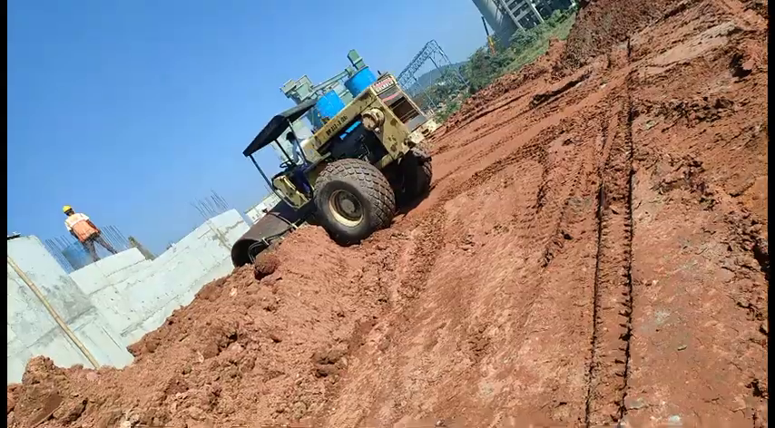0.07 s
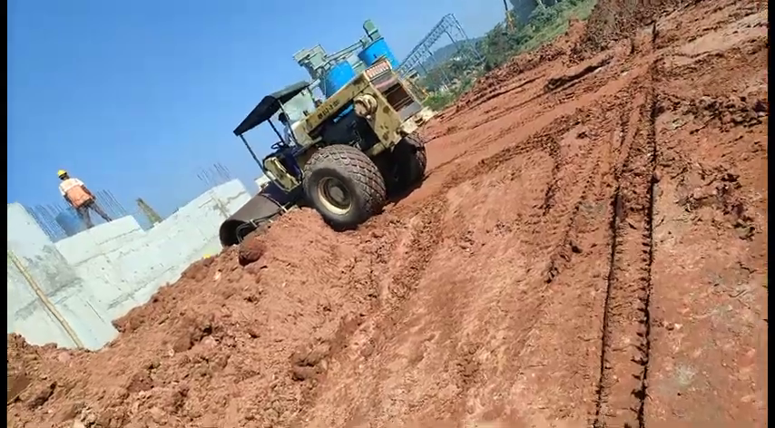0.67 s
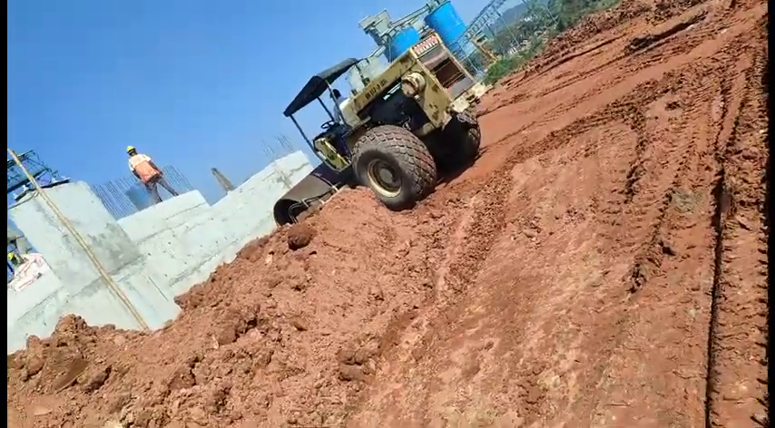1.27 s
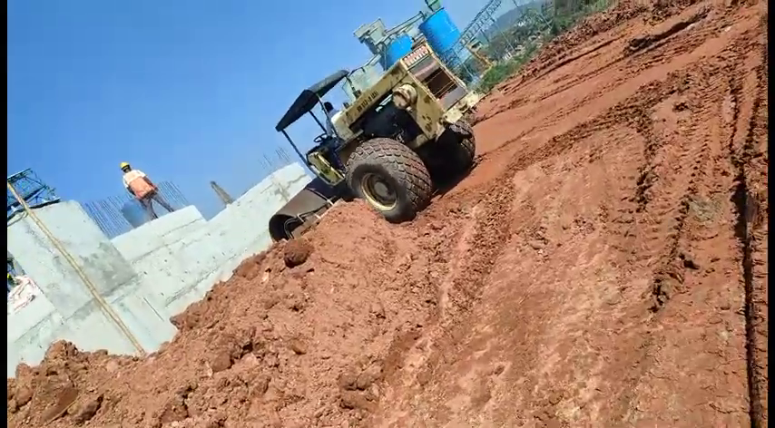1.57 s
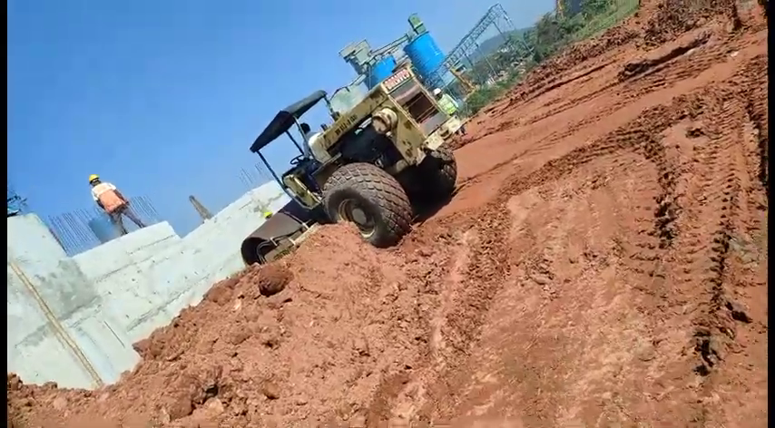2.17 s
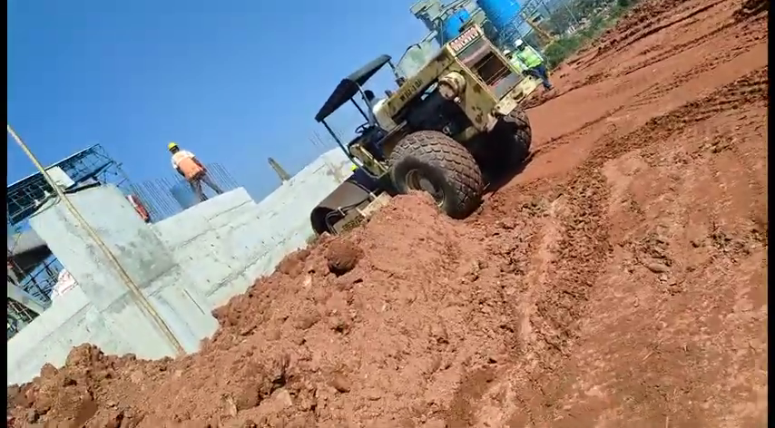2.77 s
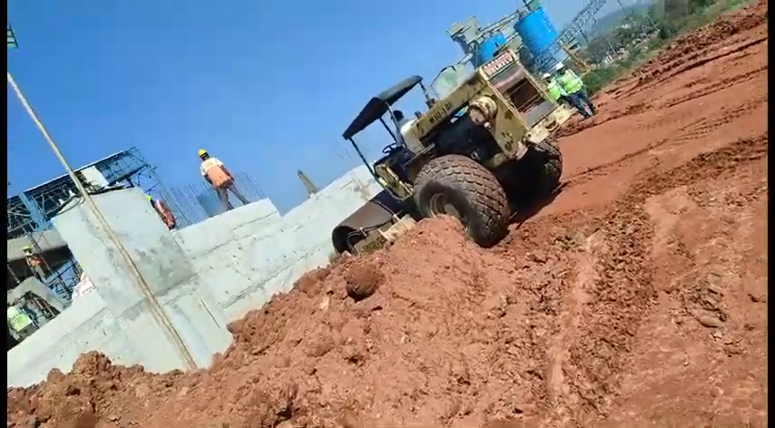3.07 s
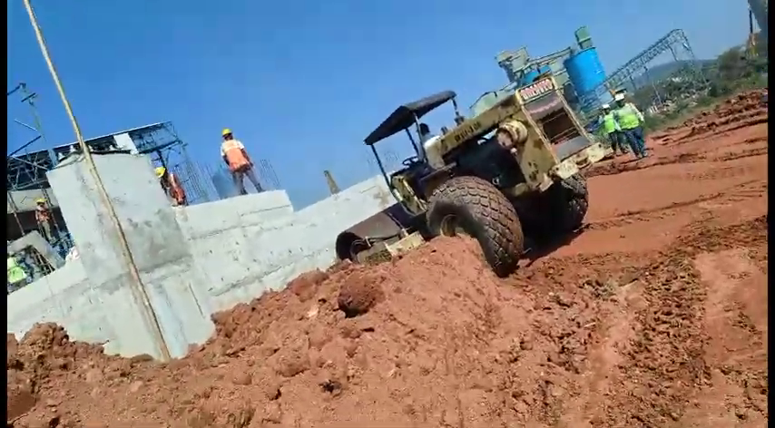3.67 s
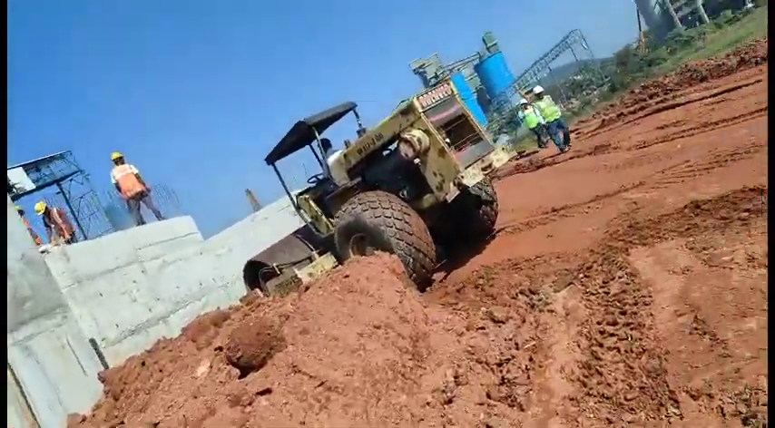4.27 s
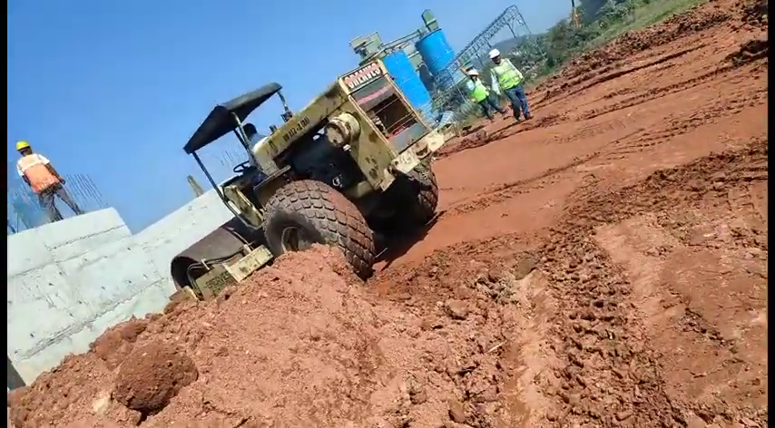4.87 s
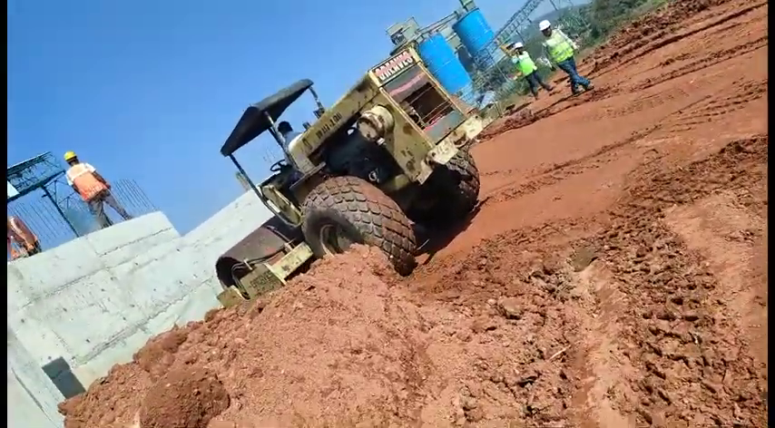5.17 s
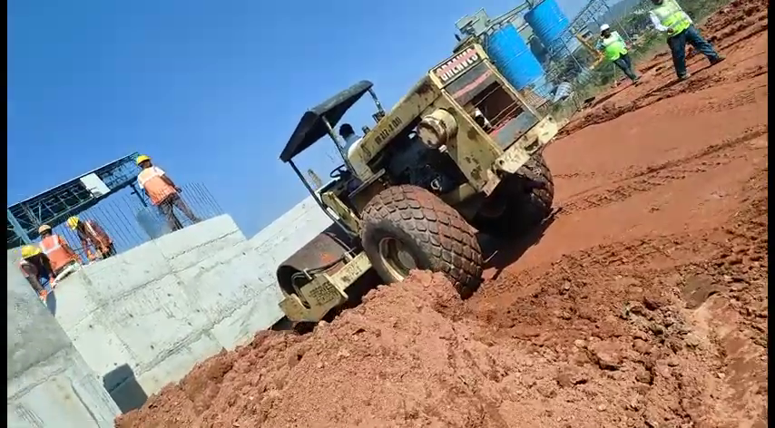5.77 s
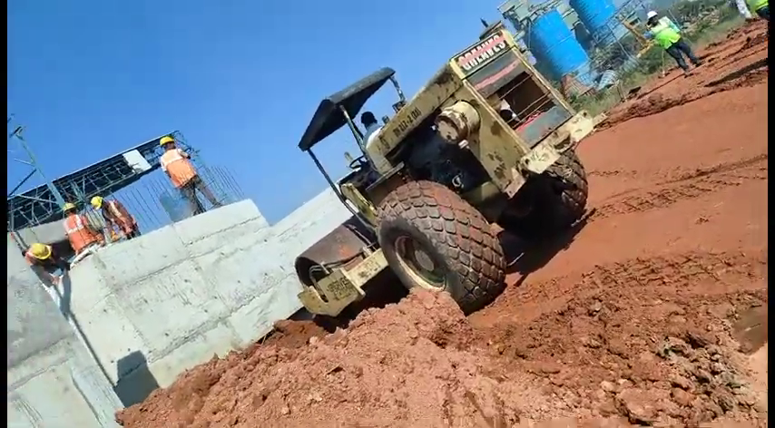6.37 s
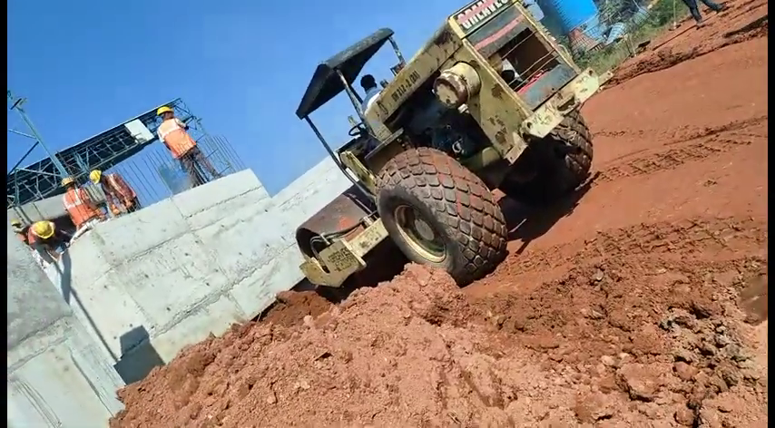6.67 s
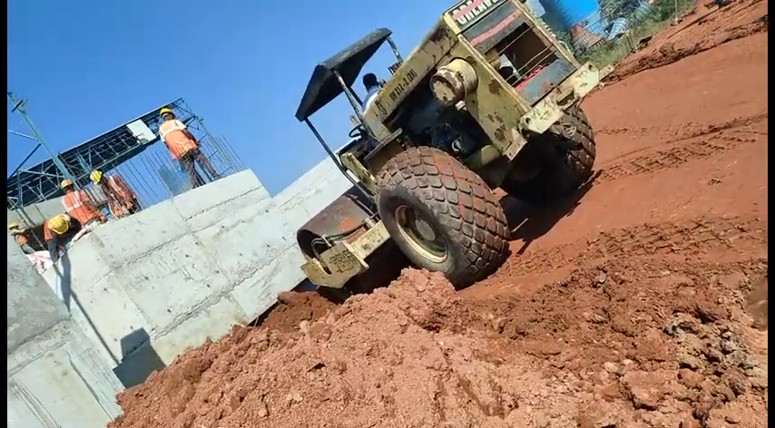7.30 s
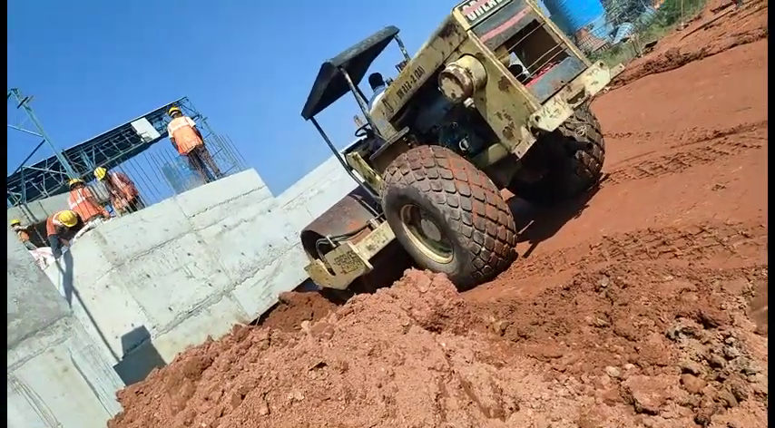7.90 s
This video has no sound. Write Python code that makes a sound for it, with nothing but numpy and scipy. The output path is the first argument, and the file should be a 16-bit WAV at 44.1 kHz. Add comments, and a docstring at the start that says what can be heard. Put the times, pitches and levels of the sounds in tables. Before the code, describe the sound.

A soil roller's diesel engine fades in within the first half second, outdoors on a construction site, and runs on as a low, steady drone with little change in level. The exhaust booms and lopes, the engine knocks and clatters in a fast, even rhythm, and a hydraulic pump whines over the rush of a cooling fan, its tones swelling and receding. From about 1 second, tinny bands of clatter drift slightly in pitch. A loose panel buzzes with a hollow rattle from around 2 seconds and settles by 4.5. Between 4.5 and 6 seconds the roller draws near, its clatter turning brighter and its low throb fuller. From 6 seconds it is close, and rapid, heavy blows ring the metal engine cover. After 7 seconds the engine speed wavers slightly and the whine sinks, while the drone and knocking continue to the end at 8 seconds.

```python
"""A soil roller fades in, backing slowly over loose earth on a low, steady six-cylinder diesel. The
exhaust booms and lopes, the block knocks and clatters in step with the crankshaft, and a nine-piston
hydraulic pump whines over the rush of the fan. As the engine bay swings into view, tinny bands of
clatter drift in pitch and a loose panel buzzes, then settles. From about 6 s the roller is close and
heavy blows ring the engine cover; in the last second the whine sinks with the oil pressure."""
import sys
import numpy as np
from scipy.fft import rfft, irfft, next_fast_len
from scipy.io import wavfile
from scipy.ndimage import map_coordinates

SR = 44100
rng = np.random.default_rng(int(sys.argv[2]) if len(sys.argv) > 2 else 0)


def bounce(signal):
    """Save signal as a 16-bit WAV file at the path given by the first command-line argument."""
    frames = np.transpose(np.atleast_2d(signal))
    limited = np.clip(frames, -1, 1)
    pcm = np.round(limited * 32767).astype(np.int16)
    wavfile.write(sys.argv[1], SR, pcm)


N = 354563

# engine speed: t/s, firing rate/Hz
FIRING_RATE = [(0, 56.6), (0.7, 56.01), (1, 56.52), (2.7, 56.42), (3.15, 55.83), (3.5, 56.19), (3.9, 55.68),
               (4.65, 55.19), (4.95, 56.03), (5.4, 56.04), (5.8, 57.1), (6.5, 57.6), (6.93, 56.97),
               (7.05, 58.9), (7.16, 59.3), (7.28, 58.3), (7.4, 56.96), (7.58, 57.22), (7.8, 59.24),
               (8.04, 58.01)]
# the roller's approach: t/s, nearness/0-1
NEARNESS = [(0, 0.04), (4.4, 0.08), (5.5, 0.32), (6.3, 0.79), (8, 0.94)]
# the open engine bay swings into view and away: t/s, view/0-1
BAY_VIEW = [(0.4, 0.13), (2.5, 0.7), (3.8, 0.94), (5.2, 1), (6.9, 0.73), (8, 0.2)]
# cylinders in firing order: excess puff strength/relative, clatter level/dB
CYLINDERS = [(-0.78, 4.5), (0.12, 6), (1, 5.5), (0.21, 5.5), (0.11, 5), (0.31, 4)]
# exhaust boom: harmonic of the firing rate, far level/dB, near level/dB
EXHAUST_BOOM = [(1, -15.4, -15.3), (2, -21.9, -21.4), (3, -22.7, -35.5)]
# its weak overtones: harmonic of the firing rate, far level/dB, near level/dB
EXHAUST_OVERTONES = [(4, -39.5, -34.5), (5, -47, -38)]
# tone colour of the exhaust pipe: f/Hz, level/dB
PIPE_COLOUR = [(15, 3), (35, 6), (47, 8.5), (66, 13), (76, 5.5), (85, 25.5), (95, -23.5), (104, 5),
               (125, -0.5), (160, -3.5), (210, -0.5), (255, 4.5), (310, -23), (420, -42), (900, -31.5),
               (2500, -120)]
# knocks in one engine cycle: position/firings, f/Hz, level/dB, facing the listener at t/s, half-span/s
KNOCKS = [(0.3, 2510, -29.5, 5.9, 1.4), (0.65, 1143, -25.5, 7, 2.5), (0.9, 583, -34.5, 0.76, 1.5),
          (1.05, 1054, -26.5, 3.5, 3.4), (1.1, 2485, -34, 5.5, 3.26), (1.57, 1090, -24.5, 6.8, 1.7),
          (0.1, 1000, -31, 4.9, 1.3), (5.45, 1000, -33, 4.7, 1.2), (1.6, 2500, -40, 3.3, 4.6),
          (1.8, 528, -35.5, 1.8, 3), (1.92, 1059, -24, 4.1, 2.0), (2.25, 2500, -26.5, 4.6, 1.4),
          (2.5, 582, -35, 1.48, 1.2), (2.98, 1054, -30, 5.2, 2.4), (3.4, 1010, -26, 5.1, 2),
          (3.97, 1010, -24, 4.3, 3.3), (4.52, 2510, -28, 4.9, 2.9), (4.63, 1090, -29, 6.1, 2.6),
          (4.72, 594, -28, 7.7, 0.98), (5.0, 1020, -31, 4.26, 0.61), (5.6, 2499, -27, 2.8, 1.8),
          (5.8, 1245, -33, 1.6, 2.7)]
# heavy blows as the engine labours close by: t/s, level/dB
HEAVY_BLOWS = [(6.061, -27), (6.162, -28), (6.217, -21), (6.426, -26), (6.476, -26), (6.531, -26),
               (6.636, -26), (6.741, -22), (6.791, -25), (6.844, -22.5), (6.896, -27), (6.951, -22.5),
               (6.999, -26), (7.056, -27), (7.154, -27), (7.256, -25), (7.359, -22), (7.416, -28),
               (7.463, -23), (7.52, -28), (7.57, -22.5), (7.624, -28), (7.672, -23), (7.775, -20.5),
               (7.878, -23), (7.98, -22.5)]
# ring of the engine cover: f/Hz, level/dB, t60/s
COVER_MODES = [(600, -11, 0.042), (1074, -7.5, 0.04), (1227, -3, 0.045), (1462, -10, 0.074),
               (1740, -11, 0.025), (2060, -15, 0.025), (2630, -12, 0.02)]
# dull crack of a blow: f/Hz, level/dB
CRACK_COLOUR = [(600, -12), (1300, 0), (2200, -5), (3400, -14), (6000, -36), (11000, -80)]
# ring of the engine block: f/Hz, bandwidth/Hz, level/dB
BLOCK_MODES = [(536, 30, -7), (650, 54, -3), (1012, 95, 2), (1215, 180, -5), (2517, 105, -9.5),
               (2790, 170, -21)]
# colour of the clatter, far and near: f/Hz, level/dB
CLATTER_FAR = [(710, -47), (1200, -6), (1450, -2), (1700, -6.5), (2120, -8), (2440, -1), (2760, -4.5),
               (3150, -12.5), (3560, -11), (4500, -21), (5000, -14), (6500, -39)]
CLATTER_NEAR = [(710, -15), (1200, -9), (1400, -6.5), (1670, -9), (1950, -7.5), (2430, -7.5), (2690, -6),
                (2960, -9), (3310, -7), (3900, -13), (5000, -13.5), (6500, -36.5)]
# top-end hiss of gears and fan: f/Hz, level/dB
HISS_COLOUR = [(2060, -29), (3500, -0.5), (4690, -4.5), (6360, 1.5), (6730, -2.5), (7570, -15),
               (9420, -17.5), (10400, -16.5), (12000, -27.5), (14800, -41), (15500, -30)]
# strong pump tones: harmonic, far level/dB, near level/dB, gain with the bay in view/dB
PUMP_TONES = [(2, -51, -41.5, 3.2), (3, -45.5, -44.5, -5), (4, -46.5, -45, 2.5), (6, -47.5, -43.5, 6),
              (10, -47, -47, -4.5), (12, -56, -54, 0)]
# faint pump tone: harmonic, level/dB
PUMP_FAINT = [(16, -51.5)]
# the whine rides the oil pressure: t/s, gain/dB
PUMP_LOAD = [(0.2, -2.5), (0.8, -1), (3.4, 0), (4.1, -2), (5.1, 1.5), (7.1, 1.5), (7.55, -6.5), (8, -9)]
# single pump tones sing out or sink away: start/s, end/s, harmonic, gain/dB
PUMP_SWELLS = [(-0.2, 1.0, 10, 5.5), (0.5, 1.6, 3, 7.5), (1.55, 2.15, 3, 12), (1.3, 4.0, 10, 4.5),
               (2.0, 3.7, 2, 3), (3.1, 3.6, 3, 12.5), (1.8, 3.5, 10, 1.5), (3.25, 3.75, 10, 3.5),
               (3.55, 5.05, 2, -6), (4.4, 6.0, 4, 2), (4.85, 5.9, 2, 3.5), (4.85, 5.7, 12, 10),
               (5.7, 6.75, 6, 3), (6.0, 7.05, 10, 3), (6.72, 7.02, 4, 4), (6.94, 7.12, 6, 9.5),
               (7.07, 7.4, 6, 5), (7.6, 8.3, 3, 11)]
# buzz of the loose panel: t/s, level/dB
PANEL_BUZZ = [(1.75, -52), (2.0, -33), (2.35, -33.5), (2.6, -30.5), (3.25, -30), (3.45, -37), (3.9, -33),
              (4.5, -52)]
# its hollow rattle: f/Hz, level/dB
PANEL_COLOUR = [(200, -38.5), (275, 3), (380, -17), (520, -30), (900, -78)]
# tinny, gliding bands of engine clatter: start/s, end/s, first f/Hz, last f/Hz, level/dB
TINNY_BANDS = [(0.6, 1.55, 1660, 1460, -46), (1.3, 3.4, 1410, 1330, -41), (1.3, 3.7, 1830, 1870, -47.5),
               (3.3, 4.0, 1300, 1200, -39.5), (3.35, 4.4, 1120, 1070, -37.5), (3.8, 4.6, 1380, 1380, -46),
               (4.3, 5.8, 1160, 1150, -43), (4.45, 5.7, 1560, 1460, -43), (5.7, 8.3, 1190, 1240, -43.5)]
# colour of the fan's rush, far and near: f/Hz, level/dB
FAN_FAR = [(20, -12), (38, -17), (60, -25), (150, 7), (240, -0.5), (320, -8), (410, -7), (520, -2),
           (660, -7.5), (790, -12), (1000, -8), (1300, -11), (2200, -62)]
FAN_NEAR = [(20, -12), (38, 8.5), (60, -15), (150, 3), (240, 0), (320, -10.5), (410, -14.5), (520, -1.5),
            (660, -6), (790, -8.5), (1000, -12), (1300, -15), (2200, -57)]
# stereo width by band: f/Hz, left-right correlation
STEREO_LIKENESS = [(150, 1), (230, 0.96), (320, 0.7), (480, 0.68), (650, 1), (820, 0), (1020, 0.8),
                   (1400, 0.12), (2400, 0.44), (3200, 0.187), (5000, -0.25), (7000, 0), (14000, 0)]
# stereo balance by band: f/Hz, left minus right/dB
STEREO_LEAN = [(60, -0.86), (170, -0.8), (280, 1.5), (700, -1.5), (1200, 2.1), (2000, -5.5), (3300, 0),
               (5500, 0), (9000, 6), (15000, -1)]

CYCLE = len(CYLINDERS)  # firings per engine cycle, two revolutions
HIT_SCATTER_DB, HIT_DETUNE = 1.6, 0.008  # hit-to-hit spread of level and relative pitch


def exhaust(crank, near):
    """The even part of the firing train: a boom smeared by the silencer, under clean overtones."""
    boom_lag, overtone_lag, smear_rad = 0.115, 0.043, 1.28  # lags in firings
    boom = np.zeros(N)
    for k, *levels_db in EXHAUST_BOOM:
        phase = 2 * np.pi * k * (crank - boom_lag) + smear_rad * (k - 2) ** 2 + 1
        boom += amp(between(levels_db, near) + 0.11 * wobble(18)) * np.cos(phase)
    for k, *levels_db in EXHAUST_OVERTONES:
        phase = 2 * np.pi * k * (crank - overtone_lag)
        boom += amp(between(levels_db, near) + wobble(2.71)) * np.cos(phase)
    return np.sqrt(2) * boom


def lope(crank, low_cut_hz=32):
    """Unequal cylinders send stronger and weaker puffs down the pipe, whose mouth sheds the sub-bass."""
    firings = np.arange(int(crank[-1]))
    excess = np.resize(np.transpose(CYLINDERS)[0], len(firings))
    excess += 0.14 * rng.standard_normal(len(firings))
    puffs = pulses(crank, firings + 0.076, -excess)
    mouth = lambda hz: hz ** 8 / (hz ** 8 + low_cut_hz ** 8)
    return amp(-29.5) * unit(filtered(puffs, lambda hz: causal(amp(along(PIPE_COLOUR, hz))) * mouth(hz)))


def knocks(crank):
    """Pistons and valves strike at set crank angles; each part rings loudest as it faces the listener."""
    ring_cycles, rise_cycles, click_db, click_s = 5, 0.8, -8, 0.0013
    turned_db, jitter_firings = -6, 0.015  # loss a half-span from facing; timing spread
    t = np.arange(round(0.05 * SR)) / SR
    cycles = np.arange(0, crank[-1] - CYCLE / 2, CYCLE)
    rings, click_envelope = np.zeros((2, N + len(t))), np.zeros(N + len(t))
    for row, (place, hz, db, facing_s, span_s) in enumerate(KNOCKS):
        late, loud, sharp = rng.standard_normal((3, len(cycles), 1))
        at = np.searchsorted(crank, cycles[:, None] + place + jitter_firings * late)
        wander_db = map_coordinates(rng.standard_normal(64), [at * 3 / SR], mode="wrap")
        facing_db = turned_db * ((at / SR - facing_s) / span_s) ** 2
        size = amp(db + facing_db + HIT_SCATTER_DB * loud + wander_db)
        envelope = np.exp(-t * hz / ring_cycles) * (1 - np.exp(-t * hz / rise_cycles))
        ring = np.sqrt(2) * size * envelope * np.exp(2j * np.pi * hz * (1 + HIT_DETUNE * sharp) * t)
        placed = lambda hits: np.bincount((at + np.arange(len(t))).ravel(), hits.ravel(), N + len(t))
        rings += [placed(ring.imag), (-1) ** row * placed(ring.real)]
        click_envelope += placed(size * np.exp(-t / click_s))
    clicks = amp(click_db) * click_envelope[:N] * noise(CLATTER_NEAR)
    pair = rings[:, :N] + clicks
    return np.std(pair) * spread(pair)


def cover_blows(crack_db=-9, crack_s=0.006, rise_s=0.0011):
    """Each heavy blow cracks and rings the engine cover, a little differently every time."""
    t = np.arange(round(0.08 * SR)) / SR
    hz, mode_db, t60 = np.transpose(COVER_MODES)[:, :, None]
    attack = 1 - np.exp(-t / rise_s)
    rings, crack_envelope = np.zeros((2, N + len(t))), np.zeros(N + len(t))
    for start_s, db in HEAVY_BLOWS:
        loud, sharp, turn = rng.standard_normal((3, len(COVER_MODES), 1))
        envelopes = attack * amp(db + mode_db + HIT_SCATTER_DB * loud - 60 * t / t60)
        phase = 2 * np.pi * hz * (1 + HIT_DETUNE * sharp) * t
        span = slice(round(start_s * SR), round(start_s * SR) + len(t))
        rings[:, span] += np.sqrt(2) * np.sum(envelopes * np.sin([phase, phase + np.pi * turn]), 1)
        crack_envelope[span] += amp(db + crack_db) * np.exp(-t / crack_s)
    pair = rings[:, :N] + crack_envelope[:N] * noise(CRACK_COLOUR)
    return np.std(pair) * spread(pair)


def clatter(crank, colour, tick_db, repeat, grain_db):
    """Injectors and gears chatter, harder on some cylinders; each firing nudges the level by tick_db."""
    cylinder_db = np.interp(crank, np.arange(CYCLE), np.transpose(CYLINDERS)[1], period=CYCLE)
    tick = np.exp(-((crank + 0.45) % 1) / 0.25)
    strength = amp(cylinder_db + tick_db * tick + grain_db * wobble(300) + 1.02 * wobble(12))
    return spread(coloured(strength * rattle(crank, repeat), colour))


def block_ring(crank, depth_db):
    """Sliding pistons keep the block ringing between knocks, most in the middle of each engine cycle."""
    scuff = amp(-depth_db * np.cos(2 * np.pi * crank / CYCLE)) * rattle(crank, repeat=0.51)
    modes = lambda hz: sum((-1) ** k * amp(db) * resonance(hz, ring_hz, width_hz)
                           for k, (ring_hz, width_hz, db) in enumerate(BLOCK_MODES))
    oil_film = lambda hz: 1 / (1 + (hz / 4000) ** 4)  # takes the edge off
    return spread(filtered(scuff, lambda hz: modes(hz) * oil_film(hz)))


def pump(crank, near, bay):
    """Nine pistons make three strokes per firing; their whine follows the oil pressure and flutters."""
    stroke = 2 * np.pi * 3 * crank + 0.03 * wobble(45) + 0.027 * wobble(6)

    def tone(k):
        """One fluttering harmonic, its phase drifting between left and right."""
        drift = 0.3 * np.array([wobble(2), wobble(2)])
        return np.sqrt(2) * np.sin(k * stroke + drift) * amp(1.2 * wobble(25))

    # the 6th harmonic sits on the block's main resonance and throbs once an engine cycle
    throb_db = (7 - 6.5 * near) * np.cos(2 * np.pi * (crank - 4.2) / CYCLE) - 1
    whine = sum(amp(db + 0.99 * wobble(1.25)) * tone(k) for k, db in PUMP_FAINT)
    for k, far_db, near_db, bay_db in PUMP_TONES:
        level_db = between((far_db, near_db), near) + bay_db * bay + 0.94 * wobble(1.66)
        swell_db = sum(db * bout(start, end, fade_s=0.24 * (end - start))
                       for start, end, harmonic, db in PUMP_SWELLS if harmonic == k)
        whine += amp(level_db + swell_db + throb_db * (k == 6)) * tone(k)
    return amp(curve(PUMP_LOAD)) * whine


def frame_thud(crank, ring_hz, width_hz, soft_db):
    """Once a revolution the shaking engine bumps the frame, hard and soft by turns; it rings briefly."""
    turns = np.arange(1.7, crank[-1], CYCLE / 2)
    bump_db = rng.standard_normal(len(turns)) + np.resize([0, soft_db], len(turns))
    bumps = pulses(crank, turns, amp(bump_db))
    return unit(filtered(bumps, lambda hz: resonance(hz, ring_hz, width_hz) ** 2))


def loose_panel(crank):
    """A loose panel is shaken into a buzz with a hollow rattle around it, then settles."""
    buzz = np.sqrt(2) * np.sin(2 * np.pi * 4.5 * crank)
    hollow = amp(-11.5) * spread(coloured(rattle(crank, repeat=0.3), PANEL_COLOUR))
    return amp(curve(PANEL_BUZZ) + 0.58 * wobble(5.51)) * (buzz + hollow)


def tinny_bands(crank, width_hz):
    """Tinny bands of engine clatter pulse with each firing and drift in pitch as the roller moves."""
    slow = filtered(rng.standard_normal((2, 2, N)), lambda hz: 1 / (1 + (2 * hz / width_hz) ** 4))
    flutter = unit(slow[0]) + 1j * unit(slow[1])
    bouts = np.zeros((2, N))
    for start_s, end_s, first_hz, last_hz, db in TINNY_BANDS:
        centre_hz = between((first_hz, last_hz), ramp(start_s, end_s - start_s))
        band = np.real(flutter * np.exp(2j * np.pi * np.cumsum(centre_hz) / SR))
        bouts += amp(db) * bout(start_s, end_s, fade_s=0.22) * band
    pulsing = amp(2.3 * np.cos(2 * np.pi * crank))
    return pulsing * np.std(bouts) * spread(bouts)


def fan(near):
    """A bed of cooling air and exhaust gas rushes unevenly, changing colour as the roller nears."""
    rush = crossfade(noise(FAN_FAR), noise(FAN_NEAR), near)
    return amp(0.65 * wobble(4.5)) * spread(rush)


def ground_bounce(x, near):
    """The earth adds a faint reflection whose lag grows as the roller nears, so the colour drifts."""
    lag_s = 0.00124 + 0.00061 * near + 0.00005 * wobble(1.27)
    at = np.arange(N)
    return x + 0.043 * np.array([np.interp(at - lag_s * SR, at, side) for side in x])


def rattle(crank, repeat):
    """Two noises of which a share repeats each engine cycle, as the same parts strike again."""
    size = 4700
    pattern = rng.standard_normal((2, size))[:, (crank / CYCLE % 1 * size).astype(int)]
    return crossfade(rng.standard_normal((2, N)), pattern, repeat)


def pulses(crank, places, sizes):
    """An impulse each time the crank passes one of the places (counted in firings)."""
    return np.bincount(np.searchsorted(crank, places), sizes, N + 1)[:N]


def spread(pair):
    """Two unrelated signals become left and right: centred in the bass, wide in the treble."""
    angle = lambda hz: np.arccos(np.clip(along(STEREO_LIKENESS, hz), -1, 1)) / 2
    mid, side = filtered(pair, lambda hz: np.array([np.cos(angle(hz)), np.sin(angle(hz))]))
    return np.array([mid + side, mid - side]) / np.std(mid)


def filtered(x, response):
    """x through a complex frequency response."""
    size = next_fast_len(N + SR // 2)
    return irfft(rfft(x, size) * response(np.fft.rfftfreq(size, 1 / SR)), size)[..., :N]


def coloured(x, colour):
    """x through an EQ curve (f/Hz, level/dB), at rms 1."""
    return unit(filtered(x, lambda hz: amp(along(colour, hz))))


def noise(colour):
    """Two unrelated noises of this colour, at rms 1."""
    return coloured(rng.standard_normal((2, N)), colour)


def resonance(hz, ring_hz, width_hz):
    """The band-pass response of one mode."""
    return 1j * hz * width_hz / (ring_hz ** 2 - hz ** 2 + 1j * hz * width_hz)


def causal(gain):
    """The minimum-phase response with this gain: it rings only after the hit."""
    cepstrum = irfft(np.log(gain + 1e-6))
    half = len(cepstrum) // 2
    cepstrum[1:half] *= 2
    cepstrum[half + 1:] = 0
    return np.exp(rfft(cepstrum))


def amp(db):
    """Decibels to gain."""
    return 10 ** (np.asarray(db) / 20)


def unit(x):
    """Scaled to rms 1."""
    return x / np.sqrt(np.mean(x ** 2) + 1e-20)


def along(points, hz):
    """(f/Hz, value) points read on a log axis."""
    point_hz, values = np.transpose(points)
    return np.interp(np.log(hz + 1), np.log(point_hz + 1), values)


def curve(points):
    """(t/s, value) points as one value per sample."""
    return np.interp(np.arange(N) / SR, *np.transpose(points))


def wobble(rate):
    """A smooth random curve, rate knots a second."""
    return map_coordinates(rng.standard_normal(4096), [np.arange(N) * rate / SR], mode="wrap")


def between(ends, share):
    """The value a share of the way from the first end to the second."""
    return ends[0] + share * (ends[1] - ends[0])


def crossfade(first, second, share):
    """An equal-power blend."""
    return np.sqrt(1 - share) * first + np.sqrt(share) * second


def ramp(start_s, length_s):
    """Rises from 0 to 1, then stays."""
    return np.clip((np.arange(N) / SR - start_s) / length_s, 0, 1)


def bout(start_s, end_s, fade_s):
    """An envelope that rises, holds and falls."""
    return ramp(start_s, fade_s) * (1 - ramp(end_s - fade_s, fade_s))


def scene():
    """The crankshaft sets the rhythm; nearness and the view into the engine bay ride the mix."""
    crank = np.cumsum(curve(FIRING_RATE)) / SR  # counted in firings
    near, bay = curve(NEARNESS), curve(BAY_VIEW)
    far_clatter, near_clatter = (clatter(crank, colour, tick_db=-1.5, repeat=0.29, grain_db=1.1)
                                 for colour in (CLATTER_FAR, CLATTER_NEAR))
    metal = knocks(crank) + cover_blows()
    metal += amp(between((-39, -37), bay)) * block_ring(crank, depth_db=1.5)
    metal += amp(between((-36, -34), bay)) * crossfade(far_clatter, near_clatter, near)
    hiss_db = between((-43, -41), bay) + 0.4 * wobble(8)
    metal += amp(hiss_db) * clatter(crank, HISS_COLOUR, tick_db=1, repeat=0.15, grain_db=1.2)
    thud = amp(between((-36.5, -32), near)) * frame_thud(crank, ring_hz=158, width_hz=80, soft_db=-7.5)
    low_end = exhaust(crank, near) + amp(-1.5 * near) * lope(crank) + thud + loose_panel(crank)
    air = amp(between((-29.5, -31), bay)) * fan(near)
    whine = pump(crank, near, bay)
    return low_end + whine + tinny_bands(crank, width_hz=140) + ground_bounce(metal, near) + air


def record(dry):
    """A quick fade-in with the bass opening late, then a left-right lean by band and a high cut."""
    open_s, fade_s, bass_open_s, bass_fade_s, top_hz = 0.0737, 0.2, 0.445, 0.018, 15500
    fade = between((amp(-21.5), amp(-1.09)), ramp(open_s, fade_s))
    gain = np.where(np.arange(N) / SR < open_s, amp(-68), fade)
    bass_gain = amp(-5.5 * (1 - ramp(bass_open_s, bass_fade_s)))
    bass = filtered(dry, lambda hz: 1 / (1 + (hz / 110) ** 8))
    opened = gain * (dry + (bass_gain - 1) * bass)
    sides = np.array([[0.5], [-0.5]])
    return filtered(opened, lambda hz: amp(along(STEREO_LEAN, hz) * sides) * (hz < top_hz))


dry = scene()
out = record(dry)
bounce(out)
```